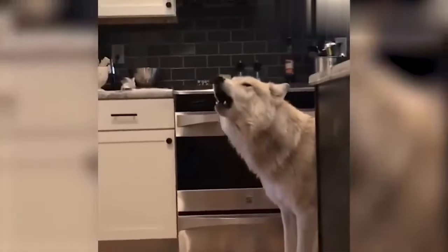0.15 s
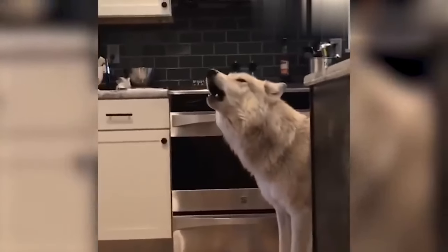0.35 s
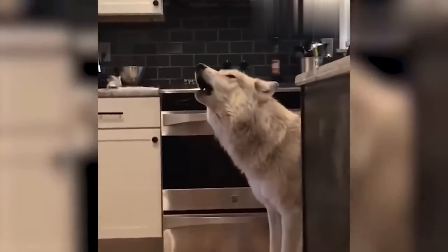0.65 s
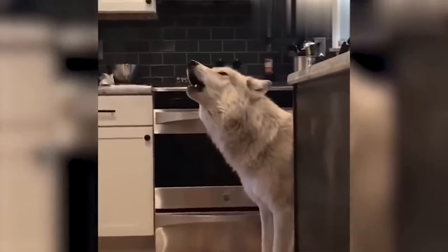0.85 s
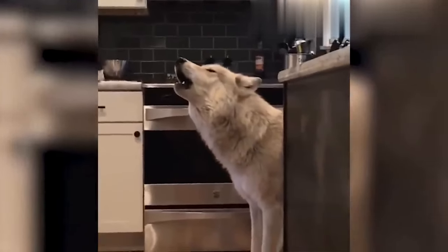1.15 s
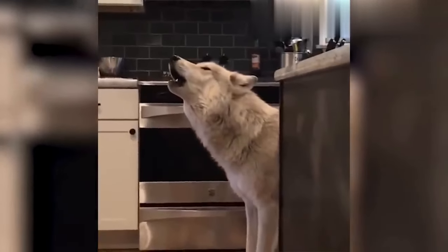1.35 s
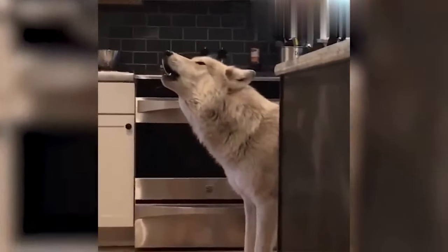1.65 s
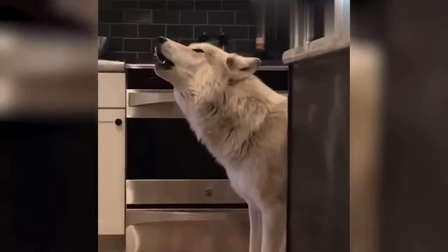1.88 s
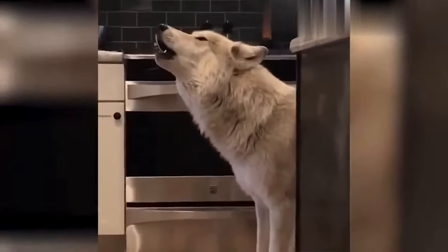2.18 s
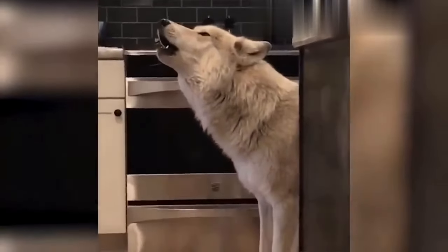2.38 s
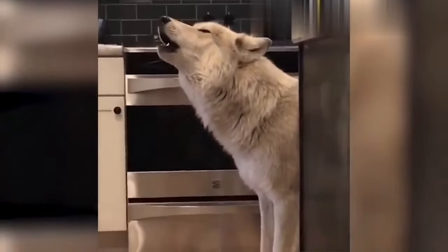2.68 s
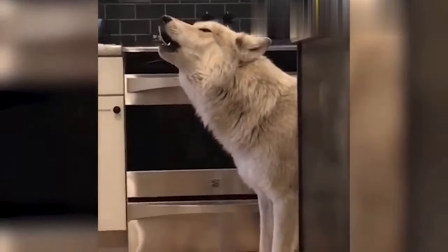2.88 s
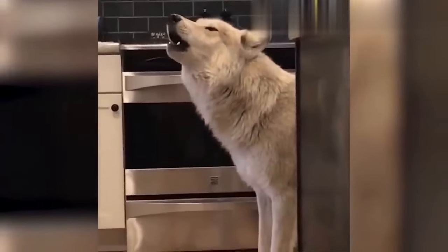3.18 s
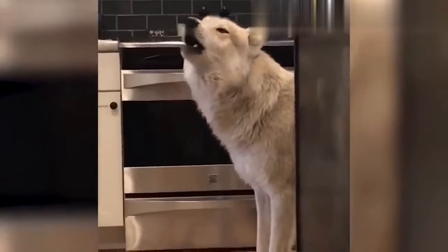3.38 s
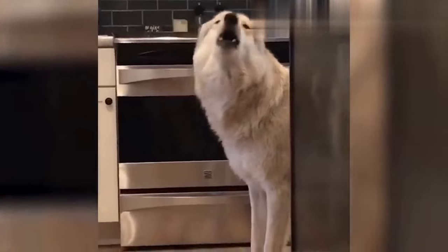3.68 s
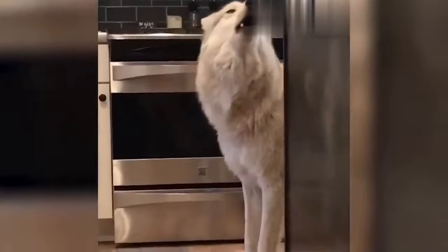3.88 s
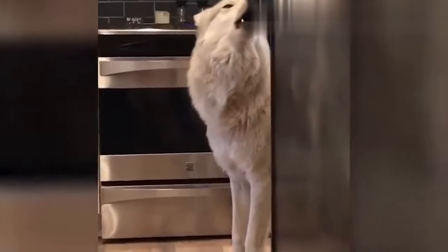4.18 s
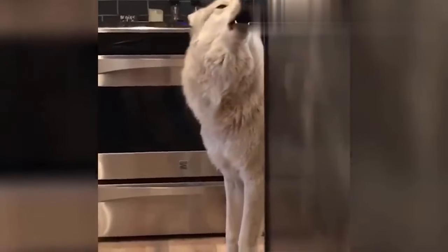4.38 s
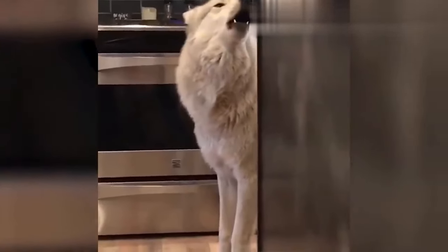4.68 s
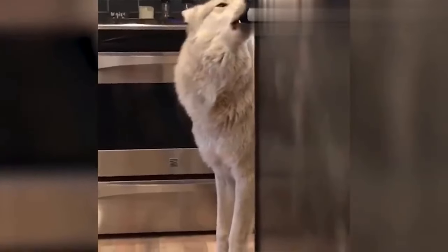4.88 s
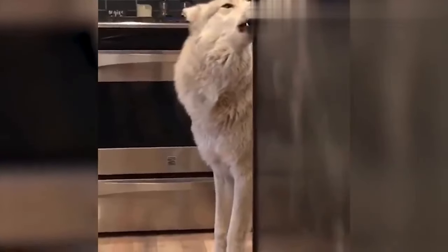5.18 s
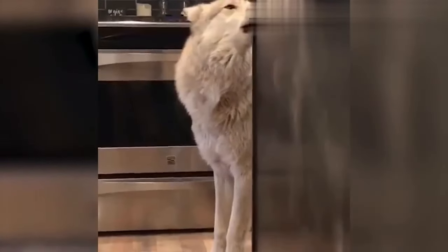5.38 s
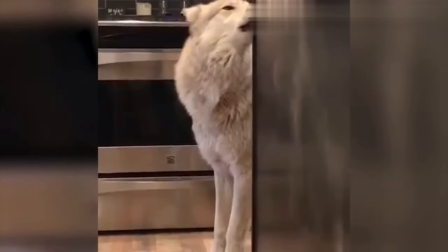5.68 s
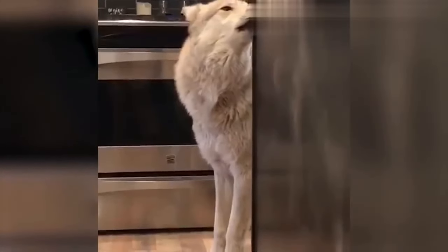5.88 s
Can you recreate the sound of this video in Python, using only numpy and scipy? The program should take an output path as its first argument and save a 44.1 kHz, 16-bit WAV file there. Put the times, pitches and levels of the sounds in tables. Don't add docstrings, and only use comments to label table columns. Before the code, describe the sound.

One continuous dog howl fills a kitchen, heard from a few steps away. It starts mid-howl on a high, airy note, slides down and cracks into a lower, purer note with a brief hard catch. The low note holds, dips and recovers as the head turns, then droops and weakens at the end. The hard room makes overtones swell and cancel, above quiet low hum and hiss.

```python
import sys
import numpy as np
from scipy import signal
from scipy.fft import rfft, irfft, next_fast_len
from scipy.io import wavfile
from scipy.ndimage import uniform_filter1d, map_coordinates

SR = 44100
rng = np.random.default_rng(int(sys.argv[2]) if len(sys.argv) > 2 else 0)


def ratio_of_db(decibels):
    return 10 ** (np.asarray(decibels, float) / 20)


def digitize_waveform(pressure):
    field = np.atleast_2d(pressure).T
    bounded = np.clip(field, -1, 1)
    quanta = np.round(bounded * 32767).astype(np.int16)
    wavfile.write(sys.argv[1], SR, quanta)


N = 266667
TIME_S = np.arange(N) / SR
BREAK_S = 1.849
SINCE_BREAK_S = TIME_S - BREAK_S


def unit(x):
    return x / np.sqrt(np.mean(x ** 2) + 1e-20)


def along(points, hz):
    point_hz, value = np.transpose(points)
    return np.interp(np.log(hz + 1), np.log(point_hz + 1), value)


def curves(rows):
    start_s, *columns = np.transpose(rows)
    return [np.interp(TIME_S, start_s, column) for column in columns]


def step(at_s, takes_s):
    return .5 + .5 * np.tanh(2 * (TIME_S - at_s) / takes_s)


def wobble(rate_hz):
    coarse = np.arange(0, N + 32, 32)
    knots = rng.standard_normal(int(N * rate_hz / SR) + 4)
    return np.interp(np.arange(N), coarse, map_coordinates(knots, [coarse * rate_hz / SR]))


def filtered(x, response):
    size = next_fast_len(N + SR // 2)
    return irfft(rfft(x, size) * response(np.fft.rfftfreq(size, 1 / SR)), size)[..., :N]


def peak(f, centre_hz, width_hz):
    return 1j * f * width_hz / (centre_hz ** 2 - f * f + 1j * f * width_hz)


def resonances(modes, column=2, notches=()):
    def response(f):
        total = sum(ratio_of_db(row[column]) * peak(f, *row[:2]) ** 2 for row in modes)
        for centre_hz, width_hz, depth in notches:
            total = total * (1 - np.clip(depth, 0, 1) * peak(f, centre_hz, width_hz))
        return total
    return response


def shaped(x, opening, modes, notches=()):
    wide = unit(filtered(x, resonances(modes, 2, notches)))
    narrow = unit(filtered(x, resonances(modes, 3, notches)))
    opening = np.clip(opening, 0, 1)
    return (opening * wide + (1 - opening) * narrow) / np.hypot(opening, 1 - opening) ** .5


def patchy(x, patchy_db):
    z = signal.stft(x, nperseg=512)[2]
    field = rng.standard_normal(z.shape)
    field = uniform_filter1d(uniform_filter1d(field, 5, 0), 12, 1)
    return signal.istft(z * ratio_of_db(patchy_db * unit(field)), nperseg=512)[1][:N]


# start_s [s], pitch_hz [Hz]
HIGH_PITCH = [
    (0, 523.1),
    (.65, 501.4),
    (.86, 486),
    (.97, 487.1),
    (1.3, 462.8),
    (1.5, 463.5),
    (1.85, 421),
]
# start_s [s], pitch_hz [Hz]
LOW_PITCH = [(1.85, 331.6), (2.25, 333.9), (3.1, 341.9), (3.42, 339.6), (3.77, 318.7), (3.99, 322.8),
             (4.17, 335.4), (4.451, 341.5), (5.0, 340.1), (5.402, 331.9), (5.972, 290.4)]


def pitch():
    sag_hz, sag_s = 31.3, .035
    overshoot_hz, settle_s = 31.46, .07
    high, low = (uniform_filter1d(curves(note)[0], SR // 12) for note in (HIGH_PITCH, LOW_PITCH))
    before = SINCE_BREAK_S < 0
    bend = np.exp(-abs(SINCE_BREAK_S) / np.where(before, sag_s, settle_s))
    return uniform_filter1d(np.where(before, high - sag_hz * bend, low + overshoot_hz * bend), 300)


def slide_rate(pitch_hz, window):
    return uniform_filter1d(abs(np.gradient(pitch_hz)) * SR, window)


# pitch_hz [Hz], level_db [dB]
MOUTH_LEVEL = [(320, -17), (500, -20.5), (680, -27.5), (880, -29), (1030, -24.5), (1340, -30.5),
               (1450, -47), (2100, -55)]
# start_s [s], pitch_hz of the partial
# [Hz], reach_s [s], depth_db [dB]
ROOM_NODES = [(.279, 513, 0.19, 23), (.469, 507, 0.099, 9), (.559, 504, 0.25, 28), (1.071, 478, 0.069, 8.5),
              (1.322, 462, 0.092, 11.5), (1.568, 456, 0.092, 11.5), (1.834, 402, .015, 16),
              (1.857, 361, 0.0074, 15.5), (0, 1045, .05, 11), (0.415, 1018, 0.15, 17.5),
              (0.851, 972, 0.037, 19), (1.001, 966, 0.055, 8), (1.102, 952, 0.089, 18),
              (1.27, 928, 0.05, 23.5), (1.535, 916, 0.022, 7.5), (1.701, 872, .08, 13),
              (1.769, 851, .04, 27), (0.761, 1480, 0.12, 10.5), (1.07, 1430, 0.05, 14.5),
              (1.337, 1387, 0.045, 28.5), (1.564, 1367, 0.031, 22), (1.697, 1310, .04, 11.5),
              (.72, 998, .07, 9), (1.891, 1044, 0.028, 14), (1.942, 1035, 0.038, 9),
              (2.004, 1011, 0.027, 15.5), (2.055, 668, 0.03, 11), (1.886, 1399, 0.049, 15),
              (1.946, 1376, 0.029, 15), (1.925, 345, 0.018, 4),
              (2.699, 1016, 0.25, 7), (3.817, 320, .08, 4), (4.161, 334, 0.051, 17), (5.429, 330, .07, 45),
             (5.593, 318, 0.025, 16), (5.829, 300, 0.054, 13), (6.019, 291, 0.025, 15),
             (2.489, 673, 0.11, 18), (3.15, 680, 0.26, 7), (3.519, 666, 0.033, 16), (4.031, 646, 0.37, 19),
             (5.507, 649, .12, 18), (5.637, 630, 0.25, 23), (5.972, 580, 0.13, 22), (3.028, 1022, 0.35, 21),
             (3.203, 1021, 0.059, 31), (3.552, 994, .03, 8), (3.687, 971, 0.022, 21),
             (3.737, 962, 0.042, 30), (3.843, 959, 0.1, 17), (4.081, 980, .03, 21), (4.414, 1018, 0.12, 25),
             (4.575, 1022, 0.092, 8), (5.034, 1019, 0.17, 8), (5.587, 956, 0.026, 16),
             (3.064, 1363, 0.22, 9.1), (3.743, 1282, 0.19, 14), (4.6, 1362, 0.15, 13),
             (5.023, 1360, .06, 15), (5.433, 1320, 0.061, 23)]


def partial(k, phase, pitch_hz, level_db, flutter_db):
    t = np.arange(0, N + 64, 64) / SR
    gain = np.ones(len(t), complex)
    for start_s, node_hz, reach_s, depth_db in ROOM_NODES:
        if round(node_hz / pitch_hz[int(max(start_s, 0) * SR)]) == k:
            x = (t - start_s) / reach_s
            gain = gain * (x + 1j * ratio_of_db(-depth_db)) / np.hypot(x, 1)
    gain = map_coordinates(gain, [np.arange(N) / 64], order=1)
    lift_db = 2.3 * (abs(peak(k * pitch_hz, 341, 8)) ** 2 - .5 * (k == 1))
    uneven_db = flutter_db * (wobble(45) - flutter_db / 9)
    size = ratio_of_db(level_db + lift_db + along(MOUTH_LEVEL, k * pitch_hz) + uneven_db)
    return size * np.sqrt(2) * np.imag(gain * np.exp(1j * (k * phase + k)))


def strong_partials(phase, pitch_hz, loud_db, firm_db, high, kick):
    high_db, turned_db, kick_db = [3, 4.5, -3.5, -3.5], [0.5, 8, 2.5, -3], [1, 7.5, 10, 7]
    turned = step(4.31, 0.34)
    flutter_db = np.clip(.3 + slide_rate(pitch_hz, SR // 8) / 120, 0, 2)
    gap_db = 7.5 * np.exp(-(SINCE_BREAK_S / 0.014) ** 2)
    surge_db = 9.5 * (1 - high) * np.exp(-abs(SINCE_BREAK_S) / 0.12)
    voice_db = loud_db - gap_db + surge_db
    total = 0
    for k in range(4):
        level_db = voice_db + k * firm_db + kick_db[k] * kick + high_db[k] * high + turned_db[k] * turned
        total = total + partial(k + 1, phase, pitch_hz, level_db, flutter_db * np.sqrt(k / 2 + .5))
    return total


# pitch_hz [Hz], width_hz [Hz], wide_open_db [dB], narrow_db [dB]
THROAT_MODES = [(1545, 200, -15, -2), (2095, 320, -2, -3.5), (2480, 306, -2, -2.5), (2570, 210, -11, -15.5),
                (3733, 110, 2, 8), (4000, 120, 2.5, -16), (4510, 320, -5, 4), (4689, 190, 5.5, 0.5),
                (5720, 210, 0, 2.5), (6440, 650, -1, -9.5), (7360, 440, -22.5, -21),
                (8840, 610, -9.5, -14.5), (9180, 300, -9.5, -9.5), (9600, 650, -5.5, -22),
                (10700, 500, -10.5, -14), (12300, 500, -21.5, -31.5)]
# pitch_hz [Hz], width_hz [Hz], depth [0-1]
SIDE_CAVITIES = [(2950, 560, 0.9), (4217, 520, 0.96), (5350, 480, 0.92), (7300, 180, 0.1), (8150, 200, 0.5)]


def throat(x, opening):
    return shaped(x, opening, THROAT_MODES, SIDE_CAVITIES)


def upper_partials(phase, opening, high, strain_db):
    slope = 2.2 - 0.72 * step(BREAK_S + 0.33, .1)
    total = 0
    for k in range(5, 36):
        fading = ratio_of_db(3.2 * wobble(2.49) + (1 + 2.0 * high) * wobble(30))
        total = total + fading * (k / 5) ** -slope * np.sin(k * phase + k * k / 3)
    return ratio_of_db(-54.5 + strain_db) * throat(total, opening)


# pitch_hz [Hz], width_hz [Hz], wide_open_db [dB], narrow_db [dB]
CHEST_MODES = [(402, 186, -12.5, 4), (580, 460, -1.5, -3), (668, 51, 1, 0.5), (840, 790, -9, -9),
               (1094, 170, 4, -2), (1260, 270, -6, -6)]


def breath(phase, opening, strain_db, leak_db, kick):
    pulses = (1 + .5 * np.sin(phase)) * ratio_of_db(.8 * wobble(12))
    air = rng.standard_normal((2, N)) * pulses
    hiss = ratio_of_db(-56.5 + leak_db) * throat(patchy(air[0], patchy_db=2.5), opening)
    chest_db = -51.5 + 0.47 * strain_db + 0.11 * leak_db + 8 * kick
    chest = shaped(patchy(air[1], patchy_db=3.0), opening, CHEST_MODES, [(1780, 2300, 1.0)])
    return hiss + ratio_of_db(chest_db) * chest


# start_s [s], end_s [s], level_db [dB]
HALF_PITCH = [
    (3.5, 4.13, -69.5),
    (5.5, 6.1, -78),
]


def undertone(phase):
    level = sum(ratio_of_db(level_db) * (step(start_s, .1) - step(end_s, .1))
                for start_s, end_s, level_db in HALF_PITCH)
    return level * ratio_of_db(2 * wobble(9.9)) * np.sqrt(2) * np.sin(phase / 2)


# start_s [s], loudness_db [dB], firmness_db [dB per strong partial],
# strain_db [dB], air_leak_db [dB]
VOICE_EFFORT = [(0, 1.5, -1, 0, 1.5), (.6, 2.5, -1, -3.5, 2), (.9, -1.5, -2, -9, 0.5),
                (1.3, 0.5, -3.5, 3, -1.5), (1.6, -3, -2, -4.5, -1.5), (1.8, -2.5, 0, 2.5, -2.5),
                (2.1, -4, -1, -2, -12), (2.45, -2, 0, -4, -9.5), (2.85, -1, 0.5, -2, -13),
                (3.4, -1, 0.5, -1.5, -12.5), (3.65, -1.5, 0, -12, -13.5), (4.07, 2.5, -0.5, 4.5, -11.5),
                (4.36, 1.5, 1, 8, -9), (4.6, -2.5, -1, 5.5, -10), (5.2, -0.5, -0.5, -3, -12),
                (5.5, -3, -2, -5.5, -16), (5.7, 1, -3.5, -11.5, -18), (6.04, -11.5, -12.5, -21, -26)]


def howl(pitch_hz):
    loud_db, firm_db, strain_db, leak_db = curves(VOICE_EFFORT)
    high = 1 - step(BREAK_S, .02)
    opening = 0.92 + (0.033 - 0.92) * step(BREAK_S, 0.12)
    kick = np.exp(-((SINCE_BREAK_S - 0.0092) / 0.0063) ** 2)
    phase = 2 * np.pi * np.cumsum(pitch_hz * (1 + .001 * wobble(25))) / SR
    strong = strong_partials(phase, pitch_hz, loud_db, firm_db, high, kick) + undertone(phase)
    weak = upper_partials(phase, opening, high, strain_db) + breath(phase, opening, strain_db, leak_db, kick)
    return strong, weak


# pitch_hz [Hz], decay_s to -60 dB [s]
KITCHEN_DECAY = [(200, .6), (1000, 1), (4000, 0.13), (10000, 0.11)]


def kitchen(x, lead=SR // 2):
    hz, t, z = signal.stft(rng.standard_normal(SR * 3 // 4), SR, nperseg=256)
    decay = ratio_of_db(-60 * t / along(KITCHEN_DECAY, hz)[:, None])
    tail = signal.istft(z * decay, SR, nperseg=256)[1]
    before = np.pad(x, (lead + 300, 0), mode="reflect")
    return signal.fftconvolve(before, tail / np.linalg.norm(tail))[lead:lead + N]


# pitch_hz [Hz], level_db [dB per Hz]
ROOM_HISS = [(20, -13.5), (60, -9), (250, 1), (1000, -14.5), (2500, -29), (3300, -38), (6300, -39),
             (9000, -29.5), (11500, -47.5), (12500, -52.5)]
# pitch_hz [Hz], width_hz [Hz], level_db [dB]
FRIDGE_HUM = [(70.5, 18, 3), (127, 22, -7.5), (157, 71, -11.5), (54, 18, -7.5)]


def room_tone():
    hiss = unit(filtered(rng.standard_normal(N), lambda hz: ratio_of_db(along(ROOM_HISS, hz))))
    hum = unit(filtered(rng.standard_normal(N), resonances(FRIDGE_HUM)))
    return ratio_of_db(-67.0) * hiss + ratio_of_db(-64) * hum


def scene():
    pitch_hz = pitch()
    strong, weak = howl(pitch_hz)
    sliding = np.clip(slide_rate(pitch_hz, SR // 10) / 60, .15, 1)
    echo = kitchen(ratio_of_db(-17.5) * sliding * strong + ratio_of_db(-7.5) * weak)
    return (strong + ratio_of_db(-1.5) * weak + echo + room_tone())[None]


def top_cut(x):
    return signal.sosfilt(signal.butter(12, 12460, fs=SR, output="sos"), x)


def record(dry):
    fade = np.minimum(1, np.arange(N)[::-1] / 130)
    return top_cut(dry * fade)


dry = scene()
out = record(dry)
digitize_waveform(out)
```